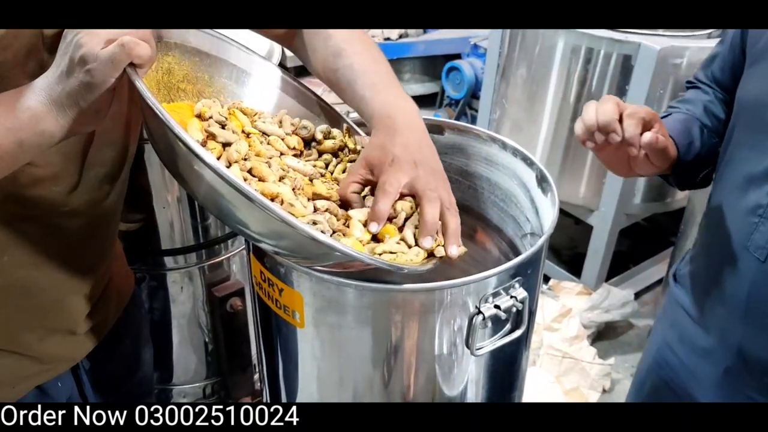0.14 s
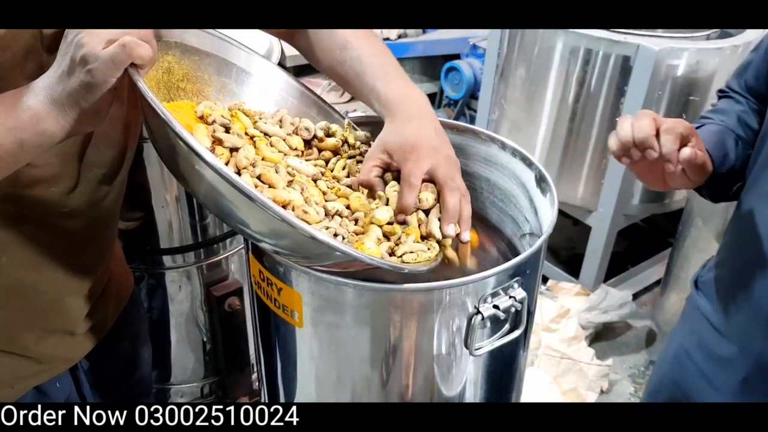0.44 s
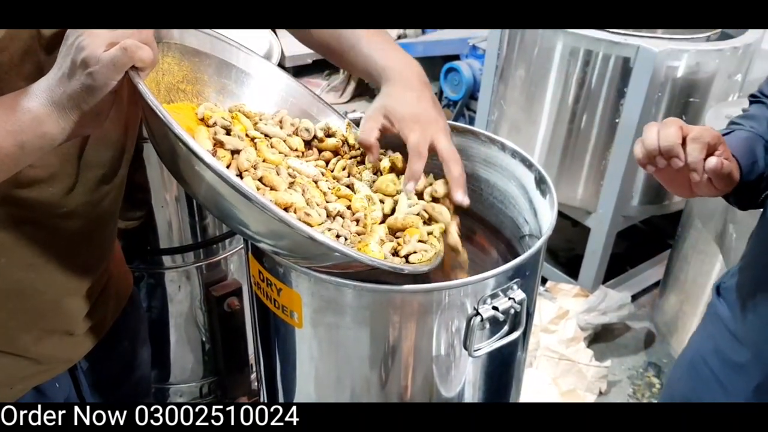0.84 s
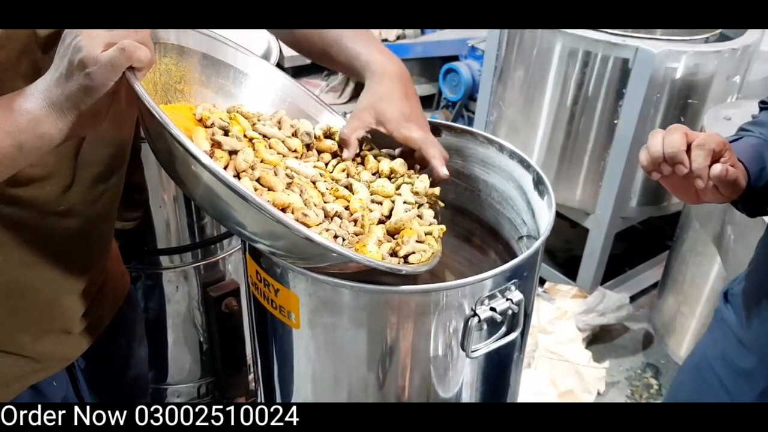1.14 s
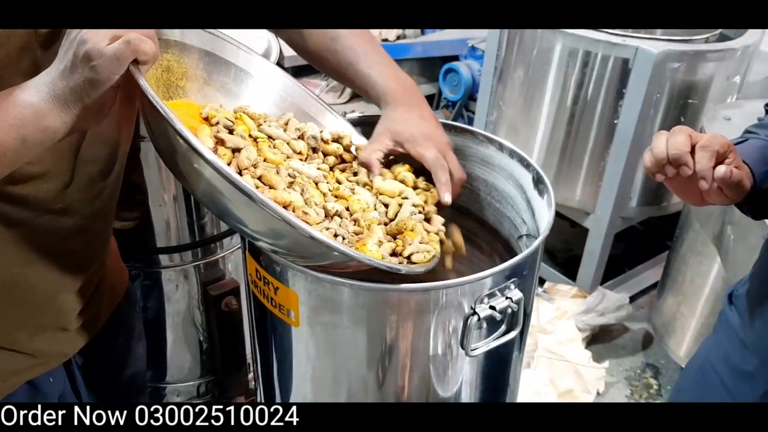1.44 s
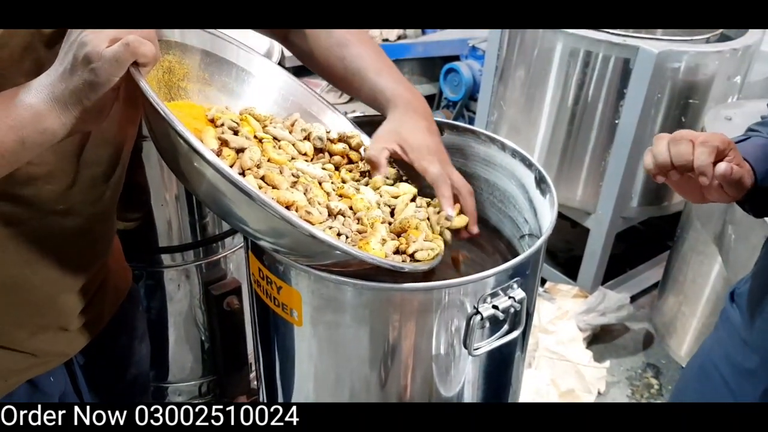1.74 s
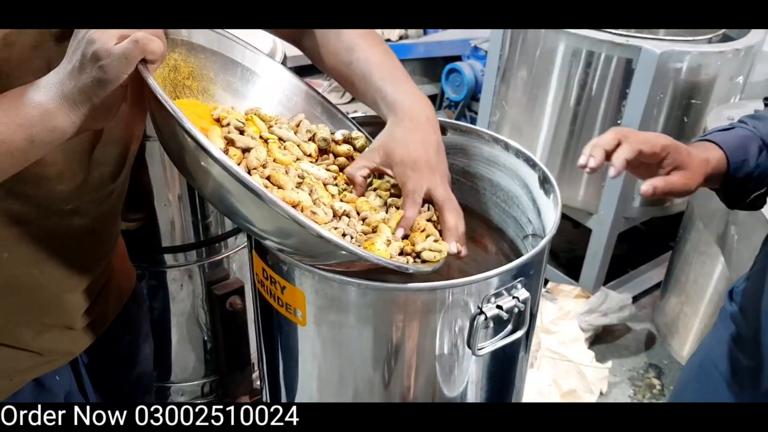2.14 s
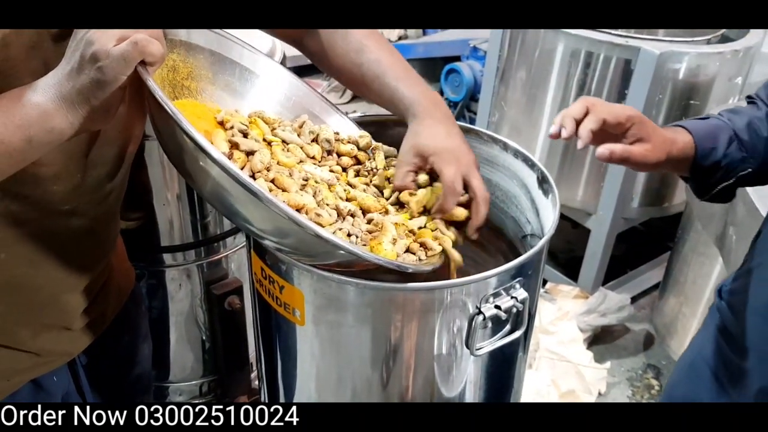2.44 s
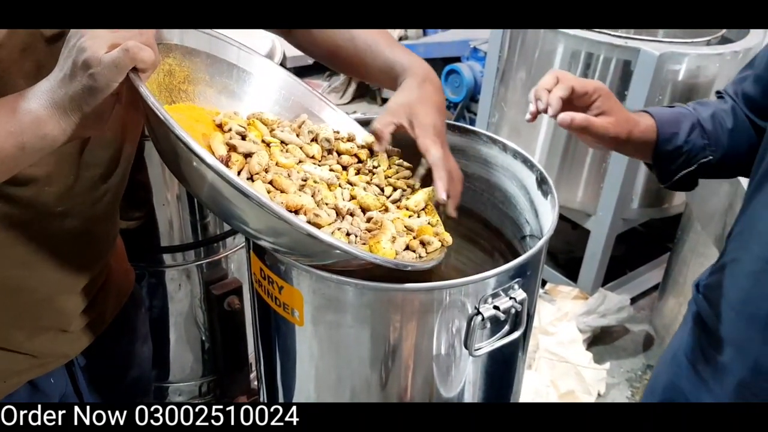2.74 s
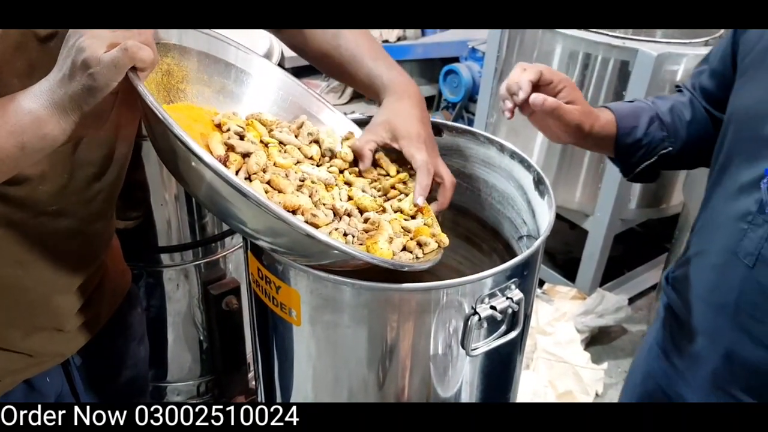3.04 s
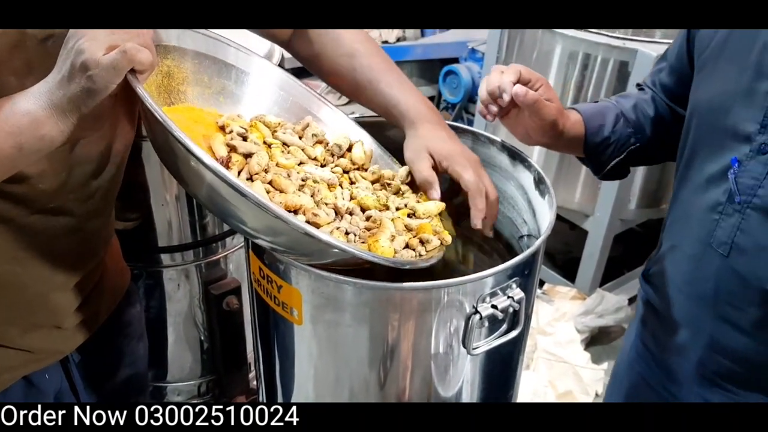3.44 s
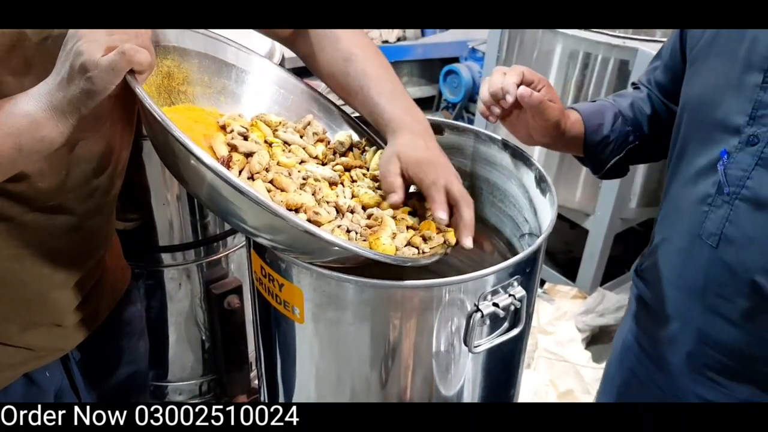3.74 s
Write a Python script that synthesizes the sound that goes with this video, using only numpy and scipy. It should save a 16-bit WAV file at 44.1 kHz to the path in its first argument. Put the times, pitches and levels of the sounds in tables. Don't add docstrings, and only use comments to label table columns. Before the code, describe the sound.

A dense clatter of dry roots falling into a metal grinder drum, ringing at first, woodier later, with a brief late burst and sparse final rattles; hollow drum echo, faint machine hum, one phone microphone.

```python
import sys
import numpy as np
from scipy import signal
from scipy.fft import rfft, irfft
from scipy.io import wavfile
from scipy.ndimage import map_coordinates

SR = 44100
rng = np.random.default_rng(int(sys.argv[2]) if len(sys.argv) > 2 else 0)


def bounce(signal):
    frames = np.transpose(np.atleast_2d(signal))
    limited = np.clip(frames, -1, 1)
    pcm = np.round(limited * 32767).astype(np.int16)
    wavfile.write(sys.argv[1], SR, pcm)


def convert_level_to_amplitude(level_db):
    exponent = np.asarray(level_db, float) / 20
    return 10 ** exponent


N = 171990


def unit(x):
    return x / np.sqrt(np.mean(x ** 2) + 1e-20)


def along(points, hz):
    f, v = np.transpose(points)
    return np.interp(np.log(hz + 1), np.log(f + 1), v)


def coloured(x, spectrum):
    target_db = along(spectrum, np.fft.rfftfreq(4096, 1 / SR))
    cepstrum = irfft(np.log(convert_level_to_amplitude(target_db) + 1e-6))
    cepstrum[1:2048] *= 2
    cepstrum[2049:] = 0
    response = irfft(np.exp(rfft(cepstrum)))[:2048]
    return signal.fftconvolve(x, response)[:N]


def blows(s, gains):
    at = np.clip(np.round(s * SR).astype(int), 0, N - 1)
    return np.bincount(at, gains, N)


def rung(s, gains, hz, t60):
    split, swell_s = .002, .003
    swell = np.exp(-1 / (swell_s * SR))
    out = np.zeros(N)
    for g, f, ring_s in zip(gains.T, hz, np.maximum(t60, .02)):
        fall = 1000 ** (-1 / (ring_s * SR))
        for side in (-1, 1):
            hits = blows(s, g * convert_level_to_amplitude(2 * rng.standard_normal(len(s)))) / 2
            w = 2 * np.pi * f * (1 + side * split * rng.random()) / SR
            for r, sign in ((fall, 1), (swell, -1)):
                out += sign * signal.lfilter([np.sin(w)], [1, -2 * r * np.cos(w), r * r], hits)
    return out


def knocks(s, db, hz, spread, t60):
    pitch = hz[:, None] * np.exp(spread * rng.standard_normal((len(s), 3)))
    t = np.arange(1800) / SR
    tones = sum(np.sin(2 * np.pi * pitch[:, k, None] * t) for k in range(3))
    ring = tones * convert_level_to_amplitude(db[:, None] - 60 * t / t60) * (1 - np.exp(-t / .0006))
    at = np.round(s * SR).astype(int)[:, None] + np.arange(len(t))
    return np.bincount(at.ravel(), ring.ravel(), N + SR)[:N]


def cracks(hits, t60, spectrum):
    fall = 1000 ** (-1 / (max(t60, .001) * SR))
    burst = signal.lfilter([1], [1, -fall], hits) * rng.standard_normal(N)
    return coloured(burst, spectrum) / np.std(coloured(rng.standard_normal(N), spectrum))


def scatter(count, modes, db):
    z = rng.standard_normal((count, 2 * modes))
    return convert_level_to_amplitude(db * z[:, :modes]) * np.sign(z[:, modes:])


def tumbled(rows, count, within_s, loss_db):
    rows = np.repeat(np.array(rows, float), count, 0)
    later = np.arange(len(rows)) % count > 0
    u = rng.random((len(rows), 2)) * later[:, None]
    s = rows[:, 0] + within_s * u[:, 0]
    peak_db = rows[:, 1] - loss_db * (later + u[:, 1])
    return s, peak_db, *rows[:, 2:].T


SHOWER = 660
# t [s], flow level [dB]
FLOW = [(0, -26), (1.1, -24), (1.28, -26.5), (1.4, -31), (1.9, -32.5), (2.3, -38.5), (2.699, -26.5),
        (2.85, -32.5), (2.95, -40.5), (3.42, -53), (3.58, -35), (3.78, -56.5)]


def shower(count, over_db, spread_db):
    u = rng.random((count, 2))
    small_s = u[:, 0] * N / SR
    s, flow_db = np.transpose(FLOW)
    return small_s, np.interp(small_s, s, flow_db) + over_db - spread_db * np.log(1 - .96 * u[:, 1])


# t [s], peak level [dB], loudest ring f [Hz], second ring f [Hz], upper rings over it [dB]
PINGS = [(0.002, -23.5, 4500, 7095, -8), (0.0623, -17.5, 5356, 7095, 0), (0.0762, -4.5, 4500, 7095, -14),
         (0.1449, -21, 5356, 7095, -8), (0.2573, -12.5, 5992, 4468, -4), (0.2971, -14, 5255, 4420, -5),
         (0.331, -18.5, 4474, 5255, -4), (0.382, -18, 5136, 7095, -4.5), (0.4154, -22.5, 6342, 4530, 0),
         (0.466, -27, 5255, 4468, 1), (0.5056, -18.5, 6342, 7413, -2), (0.5126, -21, 3833, 7413, 2.5),
         (0.548, -15.5, 4410, 5136, -4.5), (0.5774, -22.5, 5992, 7095, 2), (0.6564, -35, 5136, 3833, 6.5),
         (0.7074, -25, 5356, 7095, -1), (0.7229, -14, 5136, 3833, -9), (0.84, -19, 6901, 5255, -9),
         (0.8614, -13, 5992, 4468, -4.5), (0.9192, -16.5, 4420, 5356, 0), (0.971, -23, 5992, 5136, -14),
         (1.0301, -31, 4650, 5992, 4), (1.2035, -21, 4420, 6901, -0.5), (1.28, -24.5, 4420, 6901, -6.5),
         (1.6283, -24, 6342, 7095, 4), (1.9644, -16, 5992, 4530, -3), (2.0222, -17, 5356, 6342, 2),
         (2.59, -23, 4420, 6901, 4), (2.621, -17, 4560, 5255, -4), (2.6745, -17, 4420, 5255, -4),
         (2.809, -24.5, 5356, 6342, -1), (3.089, -38.5, 5992, 3833, -7)]
# same columns, t [s], level [dB], f [Hz], f [Hz], upper rings [dB]
TINKS = [(1.06, -34.5, 4340, 6342, 11), (1.71, -33.5, 7200, 4468, 3.5), (1.8696, -17.5, 4530, 5992, -1),
         (1.925, -33, 5136, 4468, -9), (2.1565, -28, 5136, 6342, 8.5), (2.203, -35, 4530, 3833, 5),
         (2.708, -16, 4468, 5992, -11), (3.3605, -24, 4430, 5040, -26), (3.453, -26, 4530, 5255, -1.5),
         (3.551, -23, 4530, 5800, 1), (3.564, -16, 4530, 5255, -10)]
# f [Hz], level [dB]
BLADE = [(3833, 1.5), (4420, -12), (4468, 1.5), (4530, 1.5), (5039, -5), (5136, -17), (5255, -2.5),
         (5356, -4), (5992, 1), (6169, 1), (6342, 4), (6611, -43), (6901, 5), (7095, 4.5), (7413, 1.5)]
# f [Hz], level [dB]
BLADE_TOP = [(8075, -3.5), (8376, -2), (9049, -1.5), (9528, 2), (10142, -1.5), (10993, -1.5), (11558, -3),
             (11800, 5), (12285, -10), (13044, 5), (13474, -5), (14363, -10), (14745, -12)]
# f [Hz], T60 [s]
BLADE_T60 = [(3800, .45), (4500, .42), (5300, .5), (6000, .2), (7100, .2), (9000, .14), (14000, .12)]


def blade():
    crowd_db, favoured_db, others_db = -17, 5, -12
    covered_s, muffled_time = 0.79, .22
    crowd_hz = np.geomspace(4000, 15000, 22) * np.exp(rng.normal(0, .02, 22))
    crowd = [(f, crowd_db) for f in crowd_hz]
    hz, db = np.vstack([BLADE, BLADE_TOP, crowd]).T
    top = hz > 7600

    rows = [(*row, .3 + .1 * row[0]) for row in PINGS] + [(*row, 1) for row in TINKS]
    s, peak_db, first_hz, second_hz, top_db, muffled = tumbled(rows, count=2, within_s=.012, loss_db=8)
    first = np.abs(hz - first_hz[:, None]) < 25
    second = np.abs(hz - second_hz[:, None]) < 25
    second_db = favoured_db - 2 - 11 * muffled[:, None] ** 2
    low_db = np.where(first, favoured_db, np.where(second, second_db, others_db + db))
    level = peak_db[:, None] + np.where(top, db + top_db[:, None] - 9, low_db)
    chance_db = np.where(first | second, 1, 6)
    strong = convert_level_to_amplitude(level) * scatter(len(s), len(hz), chance_db)

    small_s, small_db = shower(SHOWER // 4, over_db=-7.5, spread_db=0.0)
    small_level = small_db[:, None] + db + np.where(top, -18, 0)
    small = convert_level_to_amplitude(small_level) * scatter(len(small_s), len(hz), db=5)

    s_all, gains = np.r_[s, small_s], np.vstack([strong, small])
    share = np.clip(np.r_[muffled, .35 + .6 * small_s / covered_s], 0, 1)[:, None]
    t60 = along(BLADE_T60, hz)
    listed = len(hz) - len(crowd)
    free = rung(s_all, (gains * (1 - share))[:, :listed], hz, t60)
    damped = rung(s_all, gains * share, hz, muffled_time * t60)
    tick_colour = [(1000, -43), (5000, 22.0), (9000, 14), (16000, -10)]
    ticks = cracks(blows(s, convert_level_to_amplitude(peak_db + top_db - 1)), 0.052, tick_colour)
    return free + damped + ticks


# t [s], peak level [dB], loudest ring f [Hz]
THUDS = [(0.009, -10, 863), (0.202, -9, 820), (0.309, -8.5, 765), (0.624, -6, 907), (0.73, -7, 894),
         (0.756, -14, 834), (0.883, -4, 1184), (0.966, -3.5, 830), (1.039, -8, 910), (1.129, -7.5, 897),
         (1.173, -9, 842), (1.438, -14.5, 974), (1.577, -12, 957), (1.592, -13.5, 1100),
         (1.709, -10.5, 960), (1.922, -13.5, 1132), (2.076, -14, 828), (2.156, -9, 911), (2.331, -14, 914),
         (2.423, -12.5, 1133), (2.513, -12, 1144), (2.601, -7.5, 1144), (2.618, -7.5, 1155),
         (2.691, -11.5, 1120), (3.472, -24, 987), (3.523, -16.5, 1000), (3.555, -22, 853),
         (3.67, -26, 1110), (3.608, -22.5, 805)]
# f [Hz], level [dB]
DRUM = [(166.9, -53.5), (538.3, -61.5), (592.2, -45), (872.1, -40), (974.4, -52), (1136, -47)]
# f [Hz], T60 [s]
DRUM_T60 = [(170, .1), (600, .13), (850, .06), (1200, .08)]


def drum():
    hz, db = np.transpose(DRUM)
    db = 0.44 * (db - db.max())
    s, peak_db, near_hz = tumbled(THUDS, count=2, within_s=0.00823, loss_db=3.5)
    off_db = np.minimum(22 * np.abs(np.log2(hz / near_hz[:, None])), 14)
    strong = convert_level_to_amplitude(peak_db[:, None] - 10 + db - off_db) * scatter(len(s), len(hz), db=3)
    small_s, small_db = shower(SHOWER // 3, over_db=-15, spread_db=3.5)
    small = convert_level_to_amplitude(small_db[:, None] + db) * scatter(len(small_s), len(hz), db=5.5)
    rings = rung(np.r_[s, small_s], np.vstack([strong, small]), hz, along(DRUM_T60, hz))
    thump_colour = [(100, -65.5), (400, -18.0), (900, 1.5), (2500, -9.5), (8000, -74.5)]
    thump = cracks(0.15 * blows(s, convert_level_to_amplitude(peak_db)), 0.067, thump_colour)
    return rings + thump + knocks(s, peak_db - 13, near_hz, spread=.04, t60=.06)


# t [s], peak level [dB], pitch f [Hz], top over it [dB]
CLACKS = [(0.0136, -9.5, 3990, -14), (0.4105, -2.5, 4780, -26), (0.6186, -8, 4400, -11),
          (0.7293, -2.5, 3870, -34), (0.7624, -3, 4840, -30), (0.8384, -28, 4530, 3),
          (0.9648, -5, 6130, -38), (0.995, -9.5, 4400, -18), (1.062, -22, 3310, 13),
          (1.1303, -12.5, 3090, -27), (1.4034, -21.5, 4330, 0), (1.709, -16, 7500, -19),
          (1.8946, -10.5, 3140, -13), (1.9253, -6.5, 5370, -7), (2.1475, -15, 6870, 1),
          (2.1565, -11.5, 4570, -16), (1.4925, -23, 3700, -25), (1.5399, -23, 3700, -28),
          (1.5773, -16, 4450, -17), (1.797, -14.5, 3100, -26), (1.8497, -16.5, 3680, -20),
          (1.884, -10, 2860, -30), (2.259, -18, 2800, -40), (2.4947, -13.5, 4300, -13),
          (2.617, -9, 4050, -28), (2.695, -8, 4560, -7), (2.716, -16.5, 4430, 4), (3.4525, -23, 5150, -14),
          (3.5199, -30, 5350, -3), (2.3665, -13.5, 3040, -61), (2.4504, -12, 2780, -46),
          (2.5122, -6.5, 2660, -24), (2.5464, -14, 2850, -7), (3.227, -21.5, 4480, -36),
          (3.268, -22, 3920, -32), (3.3315, -47, 4700, 18), (3.5534, -18.5, 4680, -3),
          (3.6014, -31.5, 5140, 8), (3.6455, -14, 3980, -45), (3.6876, -21, 4000, -33)]
# t [s], peak level [dB]
SNAPS = [
    (0.4099, -8),
    (1.8497, -15.5),
    (2.261, -4),
    (2.617, -16),
    (3.267, -16.5),
    (3.6452, -4),
    (3.6896, -15.5),
]
# f [Hz], level [dB per Hz]
ROOT = [(180, -74), (300, -21), (1120, -8), (1530, -14.5), (4510, -2.5), (14500, -32), (16000, -132)]
# f [Hz], level [dB per Hz]
HEAP = [(180, -59), (300, -25), (1120, -7), (1900, -8), (3200, -3), (4800, -4), (7500, -26), (14500, -58)]


def roots():
    s, peak_db, hz, top_db = tumbled(CLACKS, count=2, within_s=.014, loss_db=7)
    small_s, small_db = shower(SHOWER, over_db=-8.0, spread_db=3.5)
    heap_hz = 3600 * np.exp(0.34 * rng.standard_normal(SHOWER))
    wood_db = np.r_[peak_db - 11, small_db]
    wood = knocks(np.r_[s, small_s], wood_db, np.r_[hz, heap_hz], spread=0.1184, t60=0.032)
    body = cracks(blows(s, convert_level_to_amplitude(peak_db - 11.5)), 0.083, ROOT)
    patter = cracks(blows(small_s, convert_level_to_amplitude(small_db - 1)), 0.036, HEAP)
    edge = cracks(blows(s, convert_level_to_amplitude(peak_db - 6.5)), 0.0092, HEAP)
    snap_s, snap_db = np.transpose(SNAPS)
    snap = cracks(blows(snap_s, convert_level_to_amplitude(snap_db)), 0.0018, HEAP)
    fizz = cracks(blows(s, convert_level_to_amplitude(peak_db + top_db - 4)), 0.022, [(3000, -5), (9000, 2), (16000, -24)])
    return wood + body + patter + edge + snap + fizz


def hum():
    start_s, rise_s, long_s = 0.0523, 0.065, 0.53
    t = np.arange(N) / SR - start_s
    shape = np.clip(np.minimum(t, long_s + rise_s - t) / rise_s, 0, 1)
    return convert_level_to_amplitude(-44.5) * shape * np.sin(2 * np.pi * 123.5 * t)


# f [Hz], T60 [s]
TAIL_T60 = [(900, 0.9), (4000, 0.66), (8000, 0.36), (15000, 0.2)]


def tail(x):
    stretch, delay = 8192, 130
    out = np.zeros(N + 2 * SR)
    for a in range(0, N, stretch):
        hz, t, z = signal.stft(rng.standard_normal(SR), SR, nperseg=256)
        fading = z * convert_level_to_amplitude(-60 * t / along(TAIL_T60, hz)[:, None])
        h = signal.istft(fading, SR, nperseg=256)[1]
        wet = signal.fftconvolve(x[a:a + stretch], h / np.linalg.norm(h))
        out[a + delay:][:len(wet)] += wet
    return out[:N]


# f [Hz], level [dB per Hz]
SHOP = [(15, -72), (25, -7.5), (76, 5), (427, -10), (886, 0), (1040, -2), (4490, -22.5), (11900, -26),
        (16000, -60)]


def shop():
    sway_db = map_coordinates(rng.standard_normal(30), [np.arange(N) * 3 / SR])
    return convert_level_to_amplitude(-45.5 + sway_db) * unit(coloured(rng.standard_normal(N), SHOP))


def scene():
    steel = blade()
    bass_cut = signal.butter(2, 140, "high", fs=SR, output="sos")
    rest = signal.sosfilt(bass_cut, drum() + roots())
    wet = convert_level_to_amplitude(-4) * tail(rest + convert_level_to_amplitude(-12) * steel)
    return (steel + rest + wet + hum() + shop())[None]


def top_cut(x):
    return signal.sosfilt(signal.butter(12, 16130, fs=SR, output="sos"), x)


def record(dry):
    x = signal.sosfilt(signal.butter(2, 60, "high", fs=SR, output="sos"), dry)
    x = x / (1 + np.abs(x / .86) ** 4) ** (1 / 4)
    x = signal.sosfilt(signal.cheby1(9, 1, 15150, fs=SR, output="sos"), x)
    return top_cut(x)


dry = scene()
out = record(dry)
bounce(out)
```